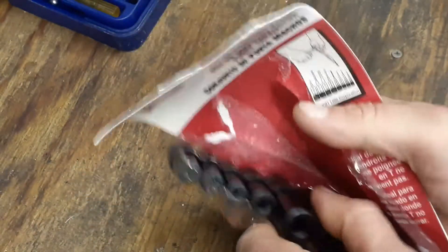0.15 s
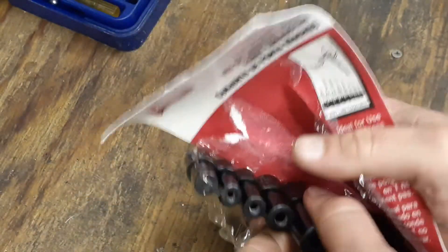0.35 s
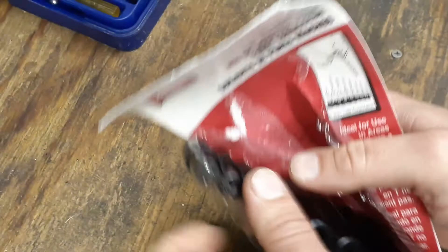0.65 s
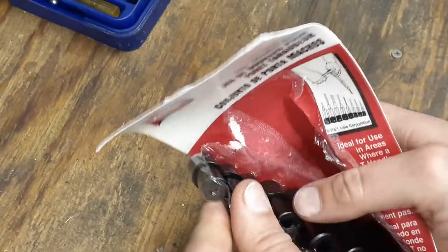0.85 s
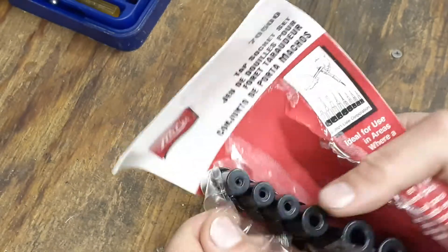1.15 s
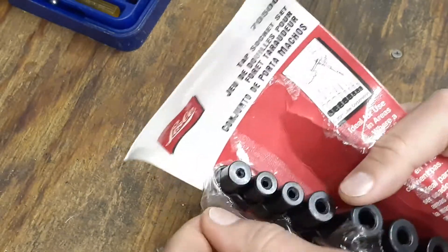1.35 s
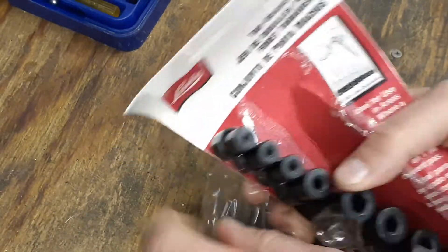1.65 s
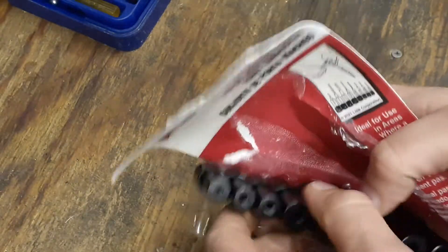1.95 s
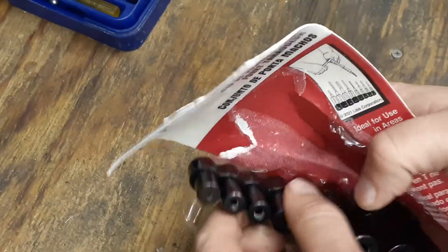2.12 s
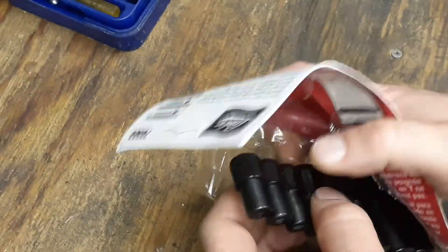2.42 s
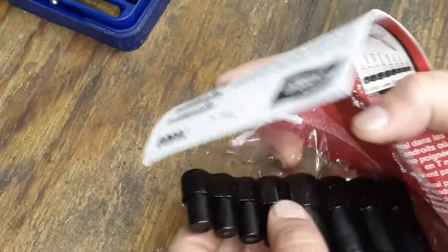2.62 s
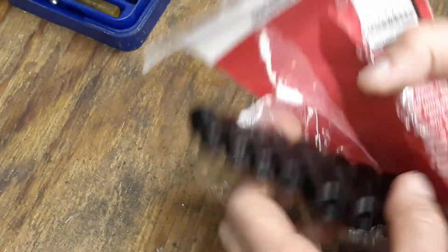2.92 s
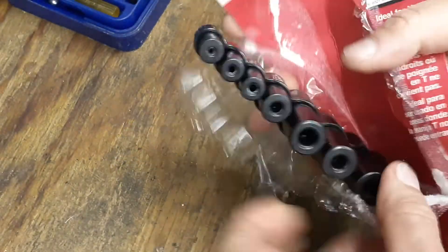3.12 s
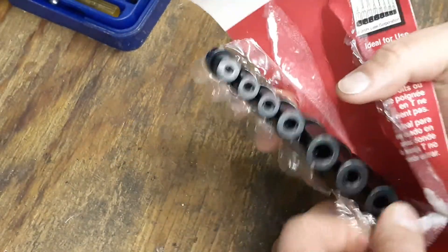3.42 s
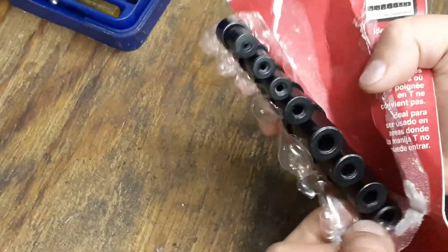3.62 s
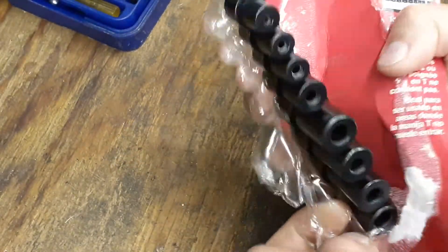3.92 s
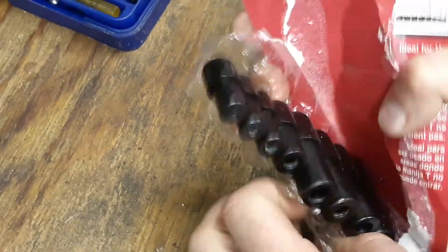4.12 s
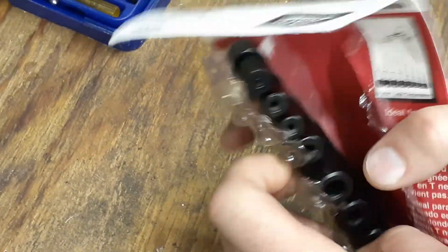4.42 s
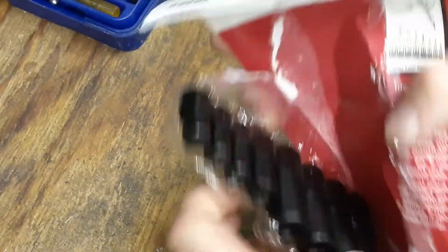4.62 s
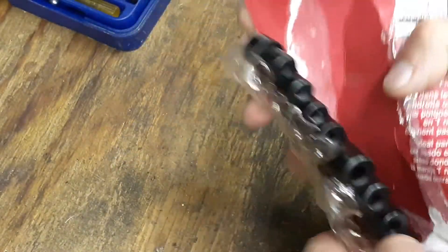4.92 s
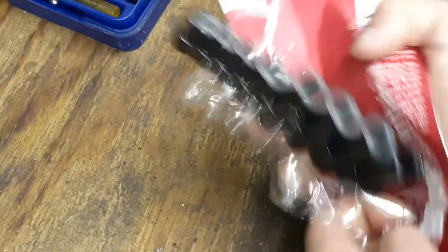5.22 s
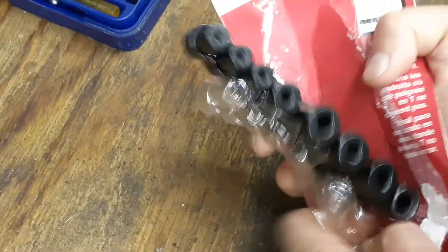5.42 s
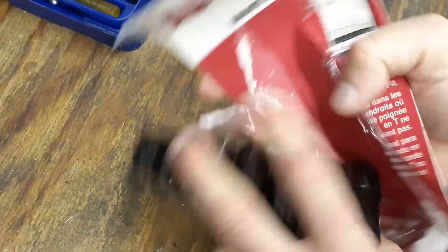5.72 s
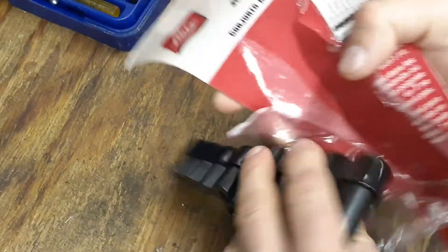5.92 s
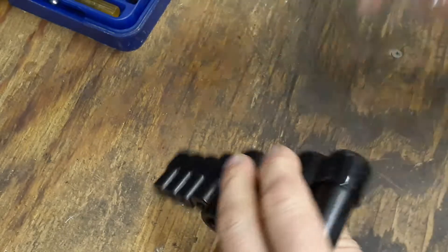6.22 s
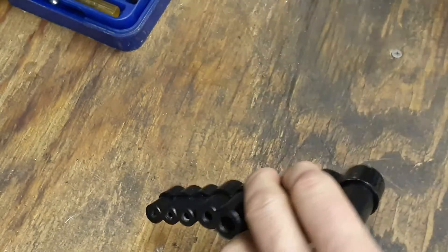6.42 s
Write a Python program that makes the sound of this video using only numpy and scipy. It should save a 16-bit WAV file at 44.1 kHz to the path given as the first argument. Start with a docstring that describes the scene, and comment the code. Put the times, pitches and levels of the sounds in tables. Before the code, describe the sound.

Close up in a small workshop, hands squeeze and pull at a stiff clear plastic sleeve on a card. Irregular crackles, hollow little pops and bright ticks come in short bursts, sparse at first, then denser. The card thumps dully now and then. Near the end the crackling thins and the tools touch a wooden bench very softly. Stereo, with short room echo and faint still air.

```python
"""Hands work a set of steel tools out of a clear plastic sleeve on a card, close by in a small workshop.
From the first squeeze, swarms of tiny buckles crinkle over rubbing film and tight creases tick (shaped noise).
Among them come large buckles: a patch flips with a hollow pop (decaying sines) as its crease cracks (noise burst).
Between 0.6 and 5.5 s the stiff card drums now and then; in the last half second the tools touch the bench
(damped modes). The room's echo (scattered noise response) and faint still air (coloured noise) last throughout."""
import sys
import numpy as np
from scipy import signal
from scipy.fft import rfft, irfft
from scipy.io import wavfile
from scipy.ndimage import uniform_filter1d

SR = 44100
rng = np.random.default_rng(int(sys.argv[2]) if len(sys.argv) > 2 else 0)


def master(y):
    """Save y as 16-bit WAV."""
    cut = np.clip(np.atleast_2d(y).T, -1, 1)
    pcm = np.round(cut * 32767)  # scale
    wavfile.write(sys.argv[1], SR, pcm.astype(np.int16))


N = 288884

# Levels "over 1 ms" state the energy of a sound as that of one millisecond at this level.
# still air of the workshop, relative spectral density: [f/Hz, level/dB per Hz]
AIR_SPECTRUM = [(25, -17.5), (45, -16), (65, 1), (110, -5), (200, -18.5), (500, -30), (1300, -19),
                (3500, -41.5), (16000, -29)]
# reverberation time of the room: [f/Hz, t60/s]
ROOM_DECAY = [(200, 1.04), (700, 0.42), (2000, 0.56), (6000, 0.67), (15000, 0.67)]
# likeness of the noise at two microphones: [f/Hz, correlation (0-1)]
MIC_LIKENESS = [(300, 0.8), (1200, 0.4), (2500, 0.6), (4500, 0.01), (8000, 0.04), (15000, 0.26)]
# the tools touch the bench: [t/s, level/dB over 1 ms]
BENCH_KNOCKS = [(6.2893, -41), (6.431, -56), (6.532, -52)]
# modes of the bench top: [f/Hz, relative level/dB, t60/s]
BENCH_MODES = [(650, -11.5, .025), (986, 0, 0.032), (1350, -8, 0.027)]
# the tools bump the card: [t/s, level/dB over 1 ms]
CARD_BUMPS = [(0.619, -30), (1.521, -24.5), (1.825, -30), (2.32, -26), (3.157, -24.5), (4.118, -33.5),
              (4.359, -23.5), (4.379, -28), (4.402, -21), (4.424, -28), (5.498, -33)]
# modes of the card, before each bump scatters their pitch: [f/Hz, relative level/dB, t60/s]
CARD_MODES = [(150, -12, 0.015), (243, -7.5, 0.018), (326.4, -6, 0.039), (390, 5, 0.011)]
# film sliding on film, relative spectral density: [f/Hz, level/dB per Hz]
SLIDE_SPECTRUM = [(60, -50), (170, -17), (300, -8), (550, -3), (830, -0.5), (1300, -8), (2100, -7),
                  (5000, -22)]
# fine crinkling, relative spectral density: [f/Hz, level/dB per Hz]
CRINKLE_SPECTRUM = [(600, -13.5), (1500, -3), (2400, 2), (3800, -1.5), (6900, -1.5), (8400, -9.5),
                    (11300, -2.5), (16000, -4.5)]
# range in which creases ring, relative spectral density: [f/Hz, level/dB per Hz]
CRACK_RANGE = [(400, -11), (1500, 0.5), (2400, -2.5), (6900, -5.5), (8200, -4.5), (12000, -11)]
# fizz on top of a crack, relative spectral density: [f/Hz, level/dB per Hz]
FIZZ_SPECTRUM = [(4000, -22.5), (7500, -5.5), (8700, -16.5), (11000, 0), (13500, -3.5), (16000, -6)]
# squeezes or pulls of the hands, gains applied to the rustle:
# [start t/s, length t/s, flexing of broad patches level/dB, crinkling of fine creases level/dB,
#  extra treble of taut film level/dB]
HAND_SQUEEZES = [(0.01, 0.09, -43.5, -39.5, 0.2), (0.17, 0.059, -38.5, -34.5, 0.8),
                 (0.391, 0.072, -45, -48, 1.5), (0.504, 0.068, -49.5, -42, 4),
                 (0.593, 0.053, -36, -37.5, 3.5), (1.06, 0.13, -62.5, -52.5, 5),
                 (1.477, 0.051, -28.5, -28.5, -1.5), (1.664, 0.18, -40.5, -37, -0.3),
                 (1.944, 0.11, -50, -50.5, 4), (2.094, 0.039, -48.5, -44.5, 0.5),
                 (2.24, 0.055, -34.5, -32.5, -7), (2.326, 0.112, -40.5, -47.5, -9),
                 (2.542, 0.065, -38.5, -37, 1.5), (2.735, 0.079, -60.5, -52, 1),
                 (2.876, 0.042, -38, -40.5, 3), (2.939, 0.069, -50.5, -43, -7.5),
                 (3.054, 0.05, -41.5, -37.5, 2), (3.143, 0.02, -28.5, -26.5, 0.5),
                 (3.276, 0.053, -48, -44.5, 5), (3.436, 0.15, -51.5, -44, 3.5), (3.681, 0.12, -63, -51, 4),
                 (3.848, 0.11, -50.5, -42, 4), (4.016, 0.14, -43, -38.5, -4.5),
                 (4.232, 0.1, -37, -38, -0.5), (4.345, 0.086, -33, -33, 1.8),
                 (4.575, 0.054, -36, -36.5, 0.5), (4.641, 0.082, -42, -48, 0.7),
                 (4.857, 0.07, -37, -40.5, 1.5), (5.04, 0.31, -44.5, -42.5, 0.8),
                 (5.175, 0.1, -32.5, -28, -5.5), (5.38, 0.069, -38, -32.5, 2.5),
                 (5.458, 0.083, -35, -38, 2), (5.554, 0.1, -41.5, -46, 2), (5.689, 0.088, -40.5, -41.5, 1),
                 (5.83, 0.047, -36, -37, 4.3), (5.903, 0.071, -46, -46, 5.5), (6.003, 0.11, -43, -43, 4.3)]
# tight creases that tick without flipping a patch: [t/s, level/dB over 1 ms, f/Hz]
CREASE_TICKS = [(0.0291, -26, 8500), (0.0937, -30, 9400), (0.208, -26, 7800), (0.756, -28, 9450),
                (0.968, -39.5, 10800), (1.074, -28, 9800), (1.0875, -30, 6250), (1.339, -35.5, 13200),
                (1.3875, -38, 7400), (1.4244, -37.5, 7100), (1.431, -34, 6600), (1.457, -22.5, 4600),
                (1.6191, -26, 5350), (1.732, -24, 2900), (1.811, -24.5, 4580), (1.9639, -21, 5500),
                (2.207, -21, 12100), (2.2638, -14, 11000), (2.5122, -30.5, 6200), (2.5378, -32, 10900),
                (2.915, -23, 6940), (3.2463, -30, 11800), (3.481, -18, 13100), (3.6405, -28, 11200),
                (3.731, -30, 6900), (4.423, -30, 3600), (4.6828, -24.5, 5140), (5.183, -21.5, 5300),
                (6.071, -23.5, 7640), (6.165, -27.5, 12400), (6.219, -47.5, 12500), (6.2725, -33.5, 7820),
                (6.345, -49, 4810)]
# large buckles of the film, levels before a common trim:
# [t/s, pop level/dB over 1 ms, pop f/Hz, crack level/dB over 1 ms, crack f/Hz]
LARGE_BUCKLES = [(0.0626, -26, 945, -30, 5470), (0.1444, -20, 820, -31, 2740),
                 (0.1747, -8.5, 1090, -17.5, 3100), (0.216, -29, 1390, -32, 5100),
                 (0.4177, -35, 1840, -32, 5840), (0.5951, -23.5, 1670, -26, 3470),
                 (0.719, -32.5, 1140, -51, 3440), (0.7707, -25.5, 1150, -26.5, 4930),
                 (0.7807, -23, 1130, -30, 2950), (0.8364, -32, 1024, -40, 6200),
                 (1.1839, -27.5, 1540, -27, 3900), (1.4628, -15, 2045, -13, 4650),
                 (1.5233, -30, 1140, -15.5, 2900), (1.6495, -38, 1400, -25.5, 4760),
                 (1.701, -20.5, 2300, -17, 2700), (1.7486, -26, 2450, -27, 2620),
                 (1.7748, -29.5, 1200, -23, 2890), (1.8242, -22, 890, -28, 2980),
                 (1.913, -29.5, 1420, -35.5, 2910), (1.9817, -25, 1750, -20.5, 3900),
                 (2.02, -32.5, 2140, -20, 3470), (2.0331, -22.5, 1170, -31, 3720),
                 (2.1241, -34, 1180, -32.5, 3580), (2.2351, -24, 930, -15.5, 4600),
                 (2.2468, -33.5, 2030, -17.5, 3830), (2.2795, -14.5, 1580, -12.5, 3930),
                 (2.288, -20, 730, -25.5, 3340), (2.3178, -22.5, 540, -32, 4270),
                 (2.3739, -18.5, 2200, -26.5, 2400), (2.41, -20.5, 1640, -19, 2920),
                 (2.445, -25.5, 1280, -30, 2980), (2.5793, -20, 790, -26.5, 2820),
                 (2.621, -25, 970, -32, 3210), (2.739, -37.5, 680, -44, 3250),
                 (2.9069, -22.5, 740, -38, 3120), (2.989, -53, 2430, -27.5, 2910),
                 (3.0938, -21.5, 800, -25.5, 5260), (3.11, -32.5, 1250, -30, 4840),
                 (3.1367, -49, 2130, -25, 2960), (3.1581, -16, 826, -22, 2630),
                 (3.208, -24, 846, -34.5, 3630), (3.3752, -30.5, 1860, -34, 2920),
                 (3.772, -31.5, 1220, -36, 3010), (4.0011, -30, 960, -36, 2750),
                 (4.025, -19.5, 2070, -13, 4400), (4.081, -21.5, 1120, -22, 2840),
                 (4.0983, -23.5, 1990, -9.5, 4270), (4.115, -20.5, 690, -21, 3570),
                 (4.1433, -23, 910, -29.5, 3370), (4.178, -30.5, 640, -38.5, 4510),
                 (4.2641, -23.5, 1250, -21.5, 3720), (4.2892, -35, 1570, -13.5, 4900),
                 (4.3092, -18, 1230, -21, 2760), (4.3583, -15.5, 1220, -19, 2800),
                 (4.3746, -36, 2010, -12.5, 2540), (4.404, -23, 1040, -29, 2740),
                 (4.5767, -26, 820, -38, 2880), (4.6127, -25.5, 1030, -27.5, 4500),
                 (4.7011, -56.5, 1220, -28, 3870), (4.7908, -24, 860, -26, 4800),
                 (4.835, -28, 840, -50.5, 2620), (4.864, -24, 670, -28, 3200),
                 (4.8921, -14.5, 896, -22, 2750), (5.0594, -24, 820, -25, 3000),
                 (5.1472, -24.5, 1340, -20, 5200), (5.1929, -21.5, 810, -12.5, 5300),
                 (5.2103, -23, 1580, -10, 5500), (5.2196, -8.5, 823, -11.5, 2900),
                 (5.2499, -15.5, 1840, -15.5, 3820), (5.3468, -22, 795, -25, 4790),
                 (5.368, -23, 1930, -19.5, 4300), (5.376, -20.5, 1110, -18, 4120),
                 (5.396, -32, 1810, -12, 6100), (5.5179, -23.5, 725, -31, 5730),
                 (5.687, -26, 1210, -23, 3060), (5.7242, -15.5, 1110, -28.5, 2330),
                 (6.026, -23.5, 1370, -37, 2750), (6.1112, -25.5, 1190, -30.5, 3840)]

EDGE_HZ = 16100  # upper end of the band
MS = SR / 1000  # samples in a millisecond
STRAIN_S = 0.003  # a crack's strain begins this long before it gives way


def amp(db):
    """Level to amplitude ratio: 20 dB is a factor of ten."""
    return 10 ** (np.asarray(db) / 20)


def read(points, hz):
    """Piecewise-linear interpolation of a spectrum over log frequency."""
    f, value = np.transpose(points)
    return np.interp(np.log(hz + 1), np.log(f), value)


def evened(x):
    """Power normalisation: scales a sound to an rms of one."""
    return x / np.sqrt(np.mean(x ** 2) + 1e-20)


def one_ms(x):
    """Energy normalisation: a short sound gets the energy of one millisecond at an rms of one."""
    return evened(x) * np.sqrt(MS / x.shape[-1])


def add(mix, s, sound):
    """Superposition: adds a sound to the mix from time s on."""
    start = max(round(s * SR), 0)
    part = mix[:, start:][:, :sound.shape[-1]]
    part += sound[..., :part.shape[1]]


def convolve(x, response):
    """Linear filtering: convolves a sound with an impulse response, keeping its length."""
    return signal.fftconvolve(np.atleast_2d(x), np.atleast_2d(response), axes=1)[:, :x.shape[-1]]


def colour(x, points, size=1024):
    """Minimum-phase filtering: a causal filter with the given spectrum keeps attacks sharp."""
    log_gain = np.log(amp(read(points, abs(np.fft.fftfreq(size, 1 / SR)))))
    # the Hilbert transform of the log gain gives the minimum phase
    transfer = np.exp(np.conj(signal.hilbert(log_gain)))
    return convolve(x, np.fft.ifft(transfer).real[:size // 2])


def hump(hz, octaves):
    """Resonance: the spectrum of one broad peak, in rows of [f/Hz, level/dB]."""
    f = np.geomspace(150, EDGE_HZ, 32)
    return np.c_[f, -10 * np.log10(1 + (np.log2(f / hz) / octaves) ** 2)]


def within(shape, limits):
    """Cascaded filters: one spectrum seen through another, their decibels adding."""
    f, db = np.transpose(shape)
    return np.c_[f, db + read(limits, f)]


def pair_noise(size):
    """Partial coherence: noise at two microphones, most alike in the bass, mostly unrelated in the treble."""
    mid, side = rfft(rng.standard_normal((2, size)))
    same = np.clip(read(MIC_LIKENESS, np.fft.rfftfreq(size, 1 / SR)), -1, 1)
    mid = mid * np.sqrt(1 + same)
    side = side * np.sqrt(1 - same)
    return evened(irfft([mid + side, mid - side], size))


def placed(x, pan_db):
    """Level difference between channels: leans a sound to the left by pan_db, to the right if negative."""
    return x * amp([[pan_db / 2], [-pan_db / 2]])


def still_air(level_db=-70.5):
    """Stationary noise: the still air of the workshop, a steady coloured floor."""
    return amp(level_db) * evened(colour(pair_noise(N), AIR_SPECTRUM, size=8192))


def response(bench_db=-17, bench_s=0.0085, scatter_s=0.0043, tail_db=-17.0, onset_s=0.0021):
    """Early reflection and reverberation: a scattered bounce off the bench, then the workshop's short tail."""
    t = np.arange(SR // 2) / SR
    bounce = pair_noise(len(t)) * (t > bench_s) * np.exp(-abs(t - bench_s) / scatter_s)
    hz, age, bands = signal.stft(pair_noise(len(t)), SR, nperseg=256)
    decay = amp(-60 * age / read(ROOM_DECAY, hz)[:, None])  # each band falls 60 dB in its own t60
    tail = signal.istft(bands * decay, SR, nperseg=256)[1][:, :len(t)]
    tail *= 1 - np.exp(-(t / onset_s) ** 2)
    return (amp(bench_db) * evened(bounce) + amp(tail_db) * evened(tail)) / np.sqrt(len(t))


def room(x, count=3):
    """Time-varying reflection: the package keeps moving, so its echo paths fade into one another."""
    turn = 2 * np.pi * np.arange(N) / SR  # one turn per second
    echo = 0
    for k in range(count):
        share = np.cos(turn + np.pi * k / count) * np.sqrt(2 / count)  # the squares add up to one
        echo = echo + convolve(x * share, response())
    return echo


def bench(rise_s=0.0015):
    """Modal decay: setting the tools down excites damped bench modes, heard as soft wooden knocks."""
    out, t = np.zeros((2, N)), np.arange(SR // 5) / SR
    ring = sum(amp(db - 60 * t / t60) * np.sin(2 * np.pi * hz * t) for hz, db, t60 in BENCH_MODES)
    knock = one_ms(ring * (1 - np.exp(-t / rise_s)))
    for s, db in BENCH_KNOCKS:
        add(out, s, amp(db) * knock)
    return out


def card(pan_db=-3.0, rise_s=0.004):
    """Heavily damped plate modes: the card drums dully when the tools knock against it."""
    out, t = np.zeros((2, N)), np.arange(SR // 5) / SR
    for s, db in CARD_BUMPS:
        ring = np.zeros(len(t))
        for hz, mode_db, t60 in CARD_MODES:
            bump_hz = hz * rng.uniform(0.86, 1.18)
            ring += amp(mode_db - 60 * t / t60) * np.sin(2 * np.pi * (bump_hz * t + rng.random()))
        add(out, s, amp(db) * one_ms(ring * (1 - np.exp(-t / rise_s))))
    return placed(out, pan_db)


def pop(hz, flutter, rise_cycles=0.42, swing_cycles=1.15, linger=0.027, linger_cycles=7, overtone=0.16,
        lag_s=0.00003, thin=0.29, octaves=0.8, size=900):
    """Snap-through buckling: a film patch flips, swings and rings on faintly; patches of like size flutter."""
    t = np.arange(size) / SR
    turns = hz * t
    phase = 2 * np.pi * hz * lag_s * rng.standard_normal((2, 1))  # the path to each microphone differs
    swing = np.sin(2 * np.pi * turns + phase)
    swing += overtone * np.sin(2 * np.pi * turns * rng.uniform(1.8, 2.2) - phase)
    swing *= 1 - np.exp(-(turns / rise_cycles) ** 2)
    swing *= np.exp(-turns / swing_cycles) + linger * np.exp(-turns / linger_cycles)
    around = colour(pair_noise(size) * np.exp(-t / 0.0026), within(hump(hz, octaves), SLIDE_SPECTRUM))
    flip = rng.choice([-1, 1]) * one_ms(swing) + flutter * one_ms(around)
    flip *= 1 - t / t[-1]
    # a small patch cannot radiate long waves
    return one_ms(signal.lfilter(*signal.butter(2, thin * hz, "high", fs=SR), flip))


def crack(points, strain=0.33, strain_s=0.00068, decay_s=0.00026, shiver=0.23, shiver_s=0.0045,
          ripple_db=3.0, size=900):
    """Sudden strain release: a crease strains, gives way and shivers briefly, each with its own colour."""
    t = np.arange(size) / SR - STRAIN_S
    before = strain * np.exp(-abs(t) / strain_s)
    after = np.exp(-abs(t) / decay_s) + shiver * np.exp(-abs(t) / shiver_s)
    burst = pair_noise(size) * np.where(t < 0, before, after)
    hz = np.geomspace(300, EDGE_HZ, 32)
    own_db = read(points, hz) + ripple_db * rng.standard_normal(len(hz))
    return one_ms(colour(burst, np.c_[hz, own_db]))


def ticks(octaves=0.46, pan_db=2.5):
    """Local strain release: single tight creases give thin, bright ticks."""
    out = np.zeros((2, N))
    for s, db, hz in CREASE_TICKS:
        add(out, s - STRAIN_S, amp(db) * crack(within(hump(hz, octaves), CRINKLE_SPECTRUM)))
    return placed(out, pan_db)


def grip(start, length, build_db=0.5, tighten_s=0.012, release_s=0.0079, settle_s=0.068, settle_db=-14):
    """Loading and relaxation: a squeeze tightens, builds while held, lets go; the film settles more quietly."""
    t = np.arange(N) / SR - start
    early, late = np.maximum(-t, 0), np.maximum(t - length, 0)
    held = amp(build_db * np.clip(t / length, 0, 1))
    letting_go = np.maximum(np.exp(-late / release_s), amp(settle_db) * np.exp(-late / settle_s))
    return held * np.exp(-early / tighten_s) * letting_go


def handling(resting_flex_db=-74):
    """Power addition: squeezes sum as gains of flexing, crinkling and treble; resting fingers stir faintly."""
    power = np.zeros((3, N))
    for start, length, flex_db, crinkle_db, taut_db in HAND_SQUEEZES:
        gains = amp([flex_db, crinkle_db, crinkle_db + taut_db])
        power += np.outer(gains ** 2, grip(start, length) ** 2)
    broad, fine, taut = np.sqrt(power)
    return np.hypot(broad, amp(resting_flex_db)), fine, taut


def swarm(grains, per_s, spread_db, size=2200):
    """Random point process: tiny buckles, a few much larger; fingers drift over patches of different size."""
    sizes = amp(spread_db * np.minimum(rng.exponential(1, N), 3))
    clicks = (rng.random(N) < per_s / SR) * sizes
    clicks /= np.sqrt(abs(uniform_filter1d(clicks ** 2, size)) * MS + 1e-3)  # evens the local power
    knots = np.arange(N // size + 2)
    drift = np.interp(np.arange(N) / size, knots, rng.random(len(knots)))
    which = (len(grains) * (drift + rng.random(N)) / 2).astype(int)
    out = np.zeros((2, N))
    for at in np.flatnonzero(clicks):
        add(out, at / SR, clicks[at] * grains[which[at]])
    return out


def rustle(flex_db=-4, slide_db=-12, crinkle_db=-2, hiss_db=-17, pan_db=1.5, taut_hz=7600, count=40):
    """Granular emission and friction: small pops and cracks under the fingers, over the rub of film on film."""
    broad, fine, taut = handling()
    patches = [pop(hz, flutter=0.48) for hz in np.geomspace(480, 2300, count)]
    creases = [crack(within(hump(hz, 0.63), CRINKLE_SPECTRUM), shiver=0.37)
               for hz in np.geomspace(1700, EDGE_HZ, count)]
    pops = swarm(patches, per_s=300, spread_db=9)
    cracks = swarm(creases, per_s=380, spread_db=5.0)
    slide = evened(colour(pair_noise(N), SLIDE_SPECTRUM))
    hiss = evened(colour(pair_noise(N), CRINKLE_SPECTRUM))
    low = amp(flex_db) * pops + amp(slide_db) * slide
    high = amp(crinkle_db) * cracks + amp(hiss_db) * hiss
    # treble above taut_hz follows the tautness of the film
    top = signal.sosfiltfilt(signal.butter(4, taut_hz, "high", fs=SR, output="sos"), high)
    return broad * low + placed(fine * (high - top) + taut * top, pan_db)


def crease_crack(crack_hz, pan_db, octaves=0.35, fizz_db=-4.5, middle_hz=4000, db_per_octave=10, scatter_db=1.5):
    """Stiffness raises pitch: a tighter crease cracks higher and fizzes more; the fizz leans further aside."""
    fizz_db += db_per_octave * np.log2(crack_hz / middle_hz)
    fizz_db += scatter_db * rng.standard_normal()  # from crease to crease
    body = crack(within(hump(crack_hz, octaves), CRACK_RANGE))
    fizz = amp(fizz_db) * crack(FIZZ_SPECTRUM)
    return placed(body, pan_db) + placed(fizz, pan_db * 2)


def snaps(pop_trim_db=1.5, crack_trim_db=1.0, jolt=1.89, left_db=0.7, wander_db=0.1):
    """Coupled buckling and strain release: in a large buckle the patch flips as its crease cracks."""
    out = np.zeros((2, N))
    for s, low_db, pop_hz, high_db, crack_hz in LARGE_BUCKLES:
        pan_db = left_db + wander_db * rng.standard_normal()
        # a hard crack shakes the whole sheet, a soft flip rings clean
        flutter = jolt * np.tanh(amp(high_db - low_db))
        flip = amp(low_db + pop_trim_db) * pop(pop_hz, flutter)
        add(out, s, placed(flip, pan_db / 2))
        add(out, s - STRAIN_S, amp(high_db + crack_trim_db) * crease_crack(crack_hz, pan_db))
    return out


def scene():
    """Superposition of direct and reflected sound: film, card and bench, their echo, and the still air."""
    near = snaps() + ticks() + rustle() + card() + bench()
    return near + room(near) + still_air()


def record(dry):
    """Band limits and saturation: deepest bass is lost, sharpest peaks are rounded, the band ends steeply."""
    thinned = signal.sosfilt(signal.butter(2, 38, "high", fs=SR, output="sos"), dry)  # small microphones
    held = thinned / (1 + (thinned / 0.9) ** 4) ** (1 / 4)  # peaks stay below 0.9
    edge = signal.firwin(301, EDGE_HZ, window=("kaiser", 8), fs=SR)
    return signal.oaconvolve(held, edge[None], "same")


dry = scene()
out = record(dry)
master(out)
```